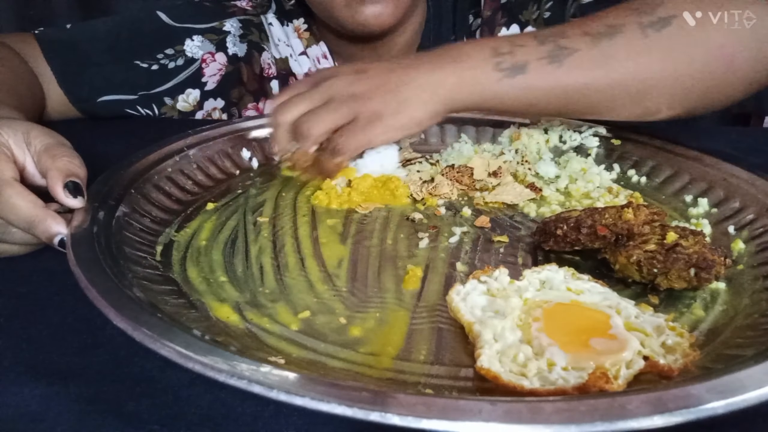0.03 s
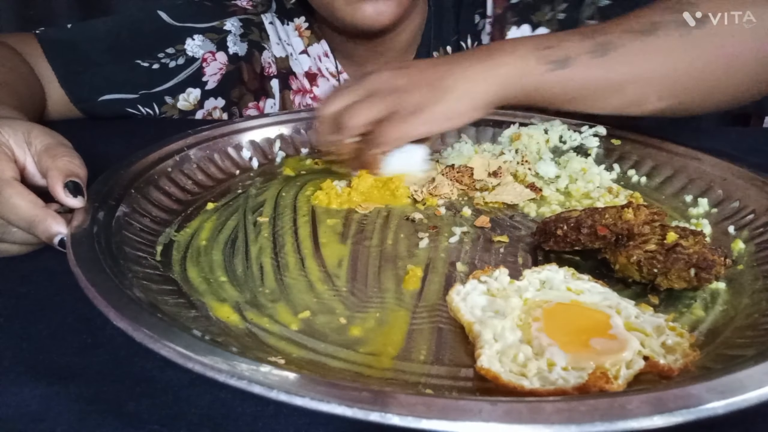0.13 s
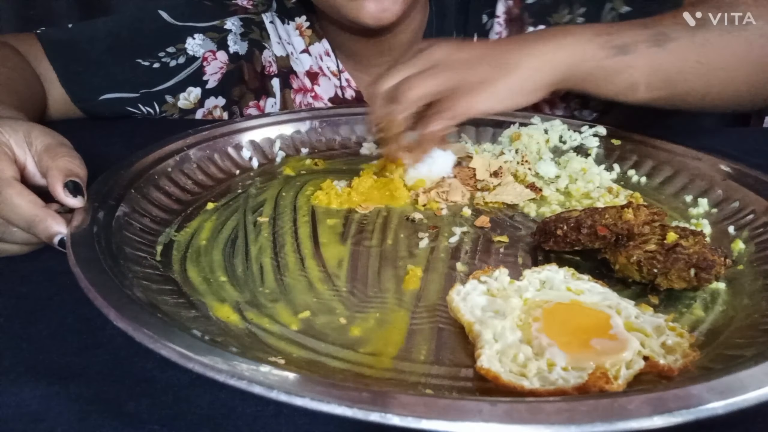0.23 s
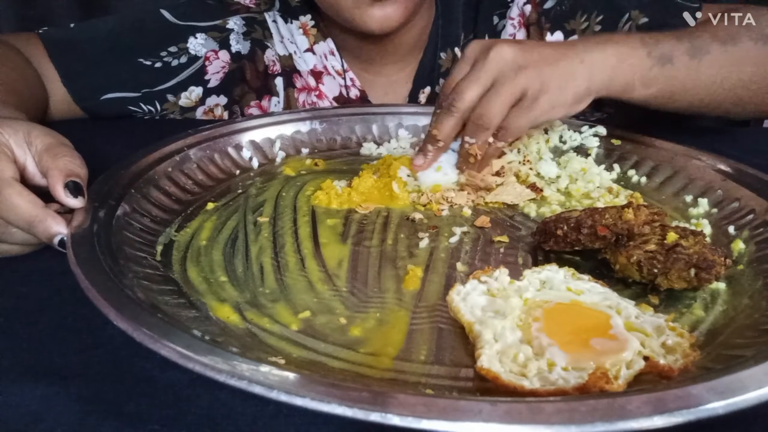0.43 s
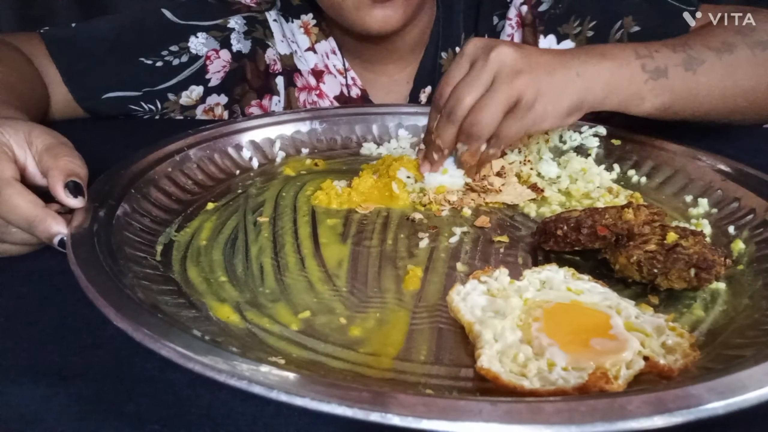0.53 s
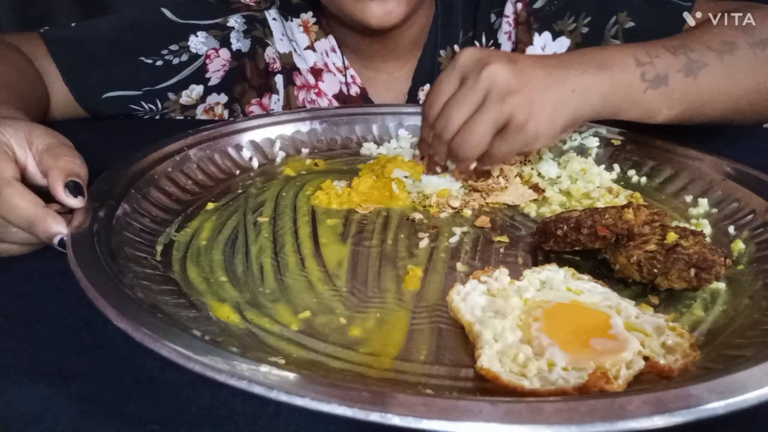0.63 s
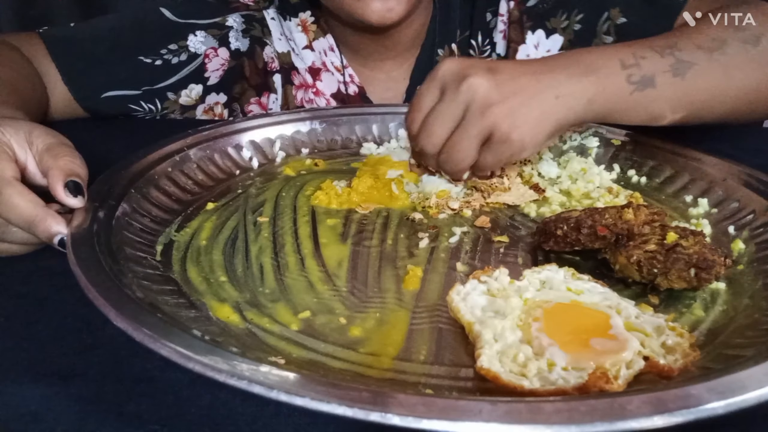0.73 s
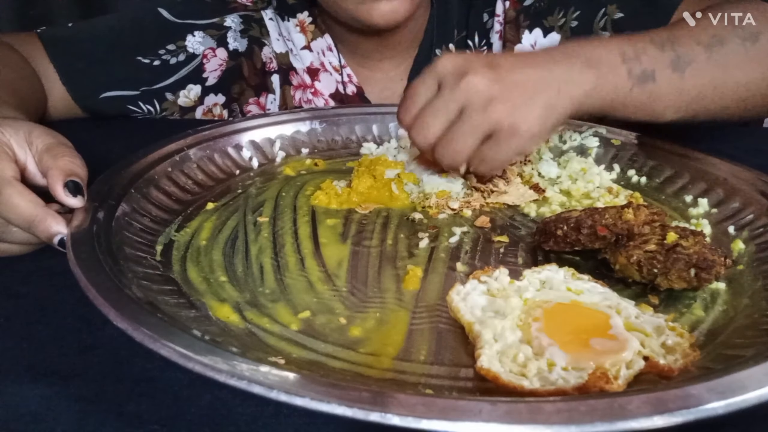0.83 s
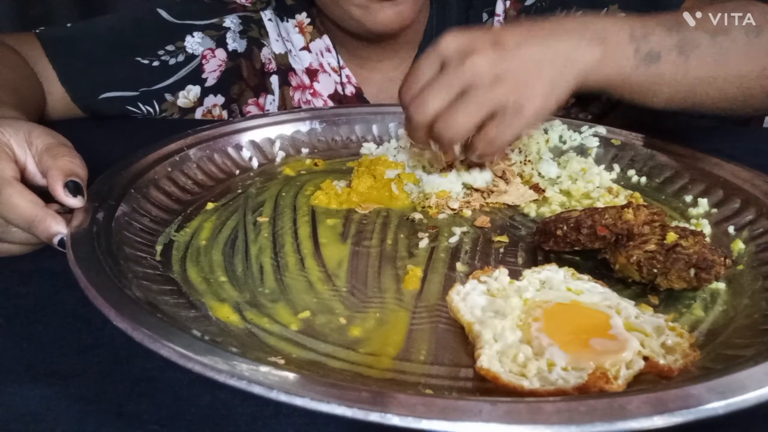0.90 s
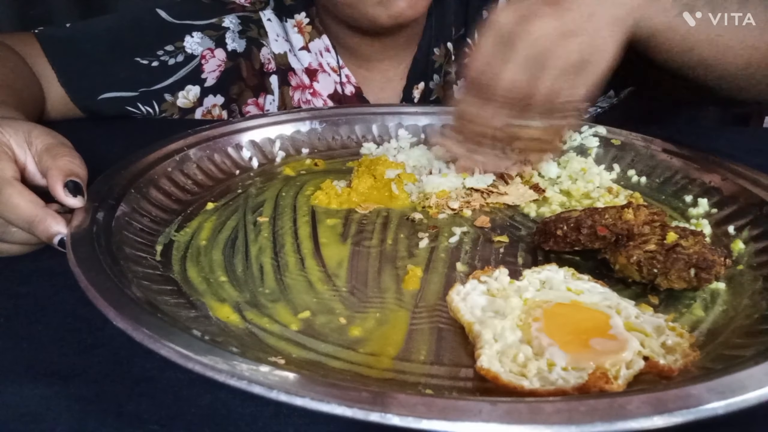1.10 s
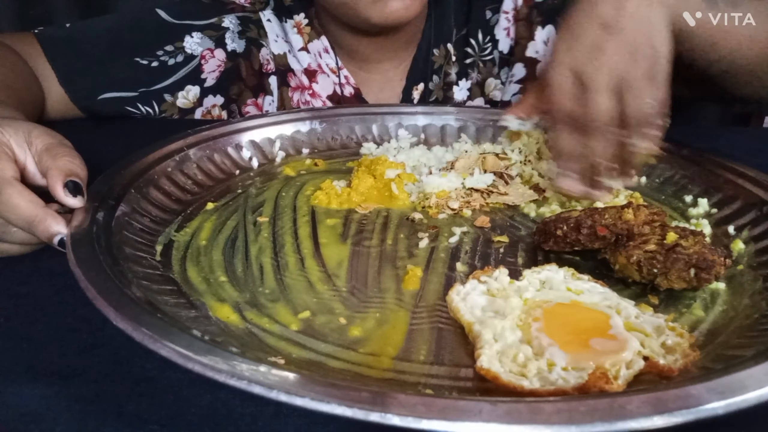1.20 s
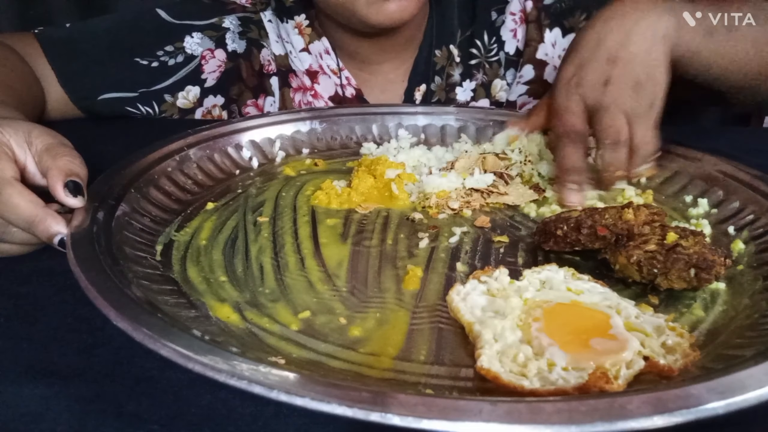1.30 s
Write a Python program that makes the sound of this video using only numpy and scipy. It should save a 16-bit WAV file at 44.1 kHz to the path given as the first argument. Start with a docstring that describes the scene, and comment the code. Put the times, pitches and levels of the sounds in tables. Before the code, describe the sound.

Fingers crush a thin fried wafer with sharp snaps, as a crow caws twice outside.

```python
"""Fingers crush crisp papad, a thin fried wafer, into rice on a steel plate.
Each break is a burst of tiny clicks that rings a flake. Hard snaps also knock the plate,
which the food muffles; small cracks and grinding crumbs crackle around them, and the plate
bumps softly under the fingers. Outside, a crow caws twice with a rough, pulsing voice.
The small room rings briefly with the crushing, over a quiet hiss."""
import sys
import numpy as np
from scipy import signal
from scipy.fft import rfft, irfft
from scipy.io import wavfile
from scipy.ndimage import uniform_filter1d, map_coordinates

SR = 44100
rng = np.random.default_rng(int(sys.argv[2]) if len(sys.argv) > 2 else 0)


def log_audio(samples):
    """Write samples as a 16-bit WAV file to the path given in sys.argv[1]."""
    # one column per channel
    frames = np.atleast_2d(samples).T
    # limit to full scale, then quantise
    limited = np.clip(frames, -1, 1)
    pcm = np.round(limited * 32767).astype(np.int16)
    wavfile.write(sys.argv[1], SR, pcm)


N = 59535

# Hard snaps: start_s, level_db, treble_db, ring_hz, decay_s, plate_db
SNAPS = [(0.2034, -13, -1, 2930, 0.0036, -23), (0.2449, -21, -6.5, 2900, 0.0019, -48),
         (0.6174, -22.5, 1, 2500, 0.0016, -55.5)]
# Tone of a snap: frequency_hz, gain_db
SNAP_TONE = [(60, -41), (550, -42.5), (850, -25.5), (1080, -25.5), (1330, -2.5), (1600, -11), (2000, -11.5),
             (2600, 1), (3000, 2.5), (3800, -3), (4500, -13.5), (5400, -7), (7500, -14.5), (9300, -17.5),
             (11000, -23.5), (12800, -37.5), (15300, -18)]


def snaps():
    """The papad breaks hard, and each break knocks the plate."""
    out = np.zeros(N)
    for start_s, level_db, treble_db, ring_hz, decay_s, plate_db in SNAPS:
        snap = flake_break(SNAP_TONE, treble_db, ring_hz, decay_s, ring_db=-10, echo_db=-2)
        add(out, start_s, undb(level_db) * snap)
        add(out, start_s, undb(plate_db) * plate_ring())
    return out


# Small cracks: start_s, level_db, treble_db, ring_hz, decay_s
CRACKS = [(0.0334, -37.5, -23, 3550, 0.003), (0.054, -41, -35, 3730, 0.00081),
          (0.166, -56.5, 21, 3730, 0.0017), (0.19, -38, 4, 3750, 0.0019), (0.2011, -23, -12, 3810, 0.0041),
          (0.2385, -37.5, 12, 3040, 0.002), (0.254, -42, 0, 3120, 0.00058),
          (0.2883, -33, -9.5, 5360, 0.0012), (0.303, -44, 0, 5380, 0.001),
          (0.338, -34.5, 12.5, 4030, 0.0022), (0.3815, -36, 7, 3920, 0.0045),
          (0.397, -36.5, 37.5, 6350, 0.0022), (0.426, -44, -2, 3880, 0.0013),
          (0.4338, -32.5, 2, 3920, 0.0015), (0.4578, -46.5, 12, 5510, 0.0015),
          (0.466, -39.5, 10, 4090, 0.0015), (0.482, -43, 15.5, 5170, 0.0012),
          (0.5003, -32, -7, 4010, 0.0011), (0.521, -34.5, 0, 3850, 0.00095), (0.526, -41, 3, 3190, 0.0015),
          (0.5433, -39.5, -14.5, 5100, 0.0012), (0.563, -44.5, -5.5, 5080, 0.00065),
          (0.576, -46.5, -5, 5190, 0.0015), (0.5855, -44.5, -1, 5000, 0.0021),
          (0.593, -37, 0, 3060, 0.0045), (0.5997, -35, 0.5, 2820, 0.0024),
          (0.631, -39.5, -14, 2780, 0.0015), (0.786, -35.5, -10.5, 3140, 0.0045),
          (0.874, -47, 2, 2760, 0.0044), (0.885, -36.5, 0.5, 3320, 0.0038), (0.892, -40.5, 6, 3230, 0.0019),
          (1.272, -57, 3.5, 3680, 0.0027)]
# Tone of cracks and crumbs: frequency_hz, gain_db
CRACK_TONE = [(100, -39.5), (700, -37), (1050, -18.5), (1400, -0.5), (2200, -3), (2900, -1.5), (3400, -3),
              (3900, -2), (4600, -5.5), (5300, -5), (6300, -4.5), (7300, -19.5), (9200, -16.5),
              (11000, -30.5), (13000, -40.5), (15300, -21.5)]


def cracks(boost_db=1):
    """Small flakes break off, each ringing at its own pitch."""
    out = np.zeros(N)
    for start_s, level_db, treble_db, ring_hz, decay_s in CRACKS:
        crack = flake_break(CRACK_TONE, treble_db + 1, ring_hz, decay_s, ring_db=11.5, echo_db=-5.5)
        add(out, start_s, undb(level_db + boost_db) * crack)
    return out


def flake_break(tone, treble_db, ring_hz, decay_s, ring_db, echo_db):
    """A run of tiny breaks rings one flake, and the sound bounces off the plate."""
    t = np.arange(4096) / SR
    clicks = np.sign(rng.standard_normal(len(t))) * np.exp(-t / decay_s)
    sound = colour(colour(clicks, tone), [(3320, 0), (8900, treble_db)])
    sound = sound + undb(ring_db) * resonance(sound, ring_hz, q=20)
    echo_s = .0031 * rng.uniform(.9, 1.1)
    sound = sound + undb(echo_db) * np.interp(t - echo_s, t, sound, left=0)
    power = uniform_filter1d(sound ** 2, 130, mode="constant")
    return sound / np.sqrt(power.max())  # level 1 at its loudest


# How loud the crumbling is over time: time_s, level_db
CRUMB_LEVELS = [(0, -57), (.02, -70), (.07, -67.5), (.14, -92), (.19, -55), (.225, -35), (.27, -49),
                (.36, -57), (.40, -47.5), (.53, -50), (.6, -69.5), (.65, -70), (.685, -55), (.72, -90),
                (.80, -67.5), (.85, -79), (.9, -50), (.97, -94.5), (1.2, -75), (1.35, -86.5)]


def crumbs(ticks_per_s=1400, pitch_count=12, spread_db=5):
    """Pieces grind together in a stream of tiny ticks of different sizes and pitches."""
    t = np.arange(N) / SR
    ticks = np.zeros(N)
    for pitch_hz in np.geomspace(2440, 11000, pitch_count):
        sizes = rng.choice([-1, 1], N) * undb(spread_db * np.minimum(rng.exponential(size=N), 2))
        hits = rng.random(N) < ticks_per_s / pitch_count / SR
        ticks += resonance(hits * sizes, pitch_hz, q=7) / np.sqrt(pitch_hz)
    level_db = np.interp(t, *np.array(CRUMB_LEVELS).T)
    return unit(colour(ticks, CRACK_TONE)) * undb(level_db)


# Notes of the food-covered plate: pitch_hz, gain_db, fade_s (time to fall by 60 dB)
PLATE_NOTES = [(837.4, 2, 0.074), (885, -11, .22), (1292.6, -4.5, 0.051), (1907, -17, .15),
               (2303, -4, 0.078), (2946, -12, .12), (3300, -9, 0.11), (3450, -11.5, 0.13),
               (3830, -13.5, .1), (5060, -7.5, .08), (6440, -13, .08)]


def plate_ring():
    """One knock rings the steel plate, and the food quickly stills it."""
    t = np.arange(N) / SR
    ring = np.zeros(N)
    for pitch_hz, gain_db, fade_s in PLATE_NOTES:
        note = np.sin(2 * np.pi * pitch_hz * t) * fade(t, fade_s)
        ring += undb(gain_db) * note * rng.choice([-1, 1])
    return keep_side(ring, "high", 765, order=6)  # slower motion makes little sound


# Finger pushes: start_s, level_db
PUSHES = [(0.206, -59), (0.244, -60), (0.423, -68.5), (0.619, -68.5)]


def pushes(pitch_hz=276, q=1.7, rise_s=0.018):
    """The plate bends under the fingers with soft, low bumps."""
    out = np.zeros(N)
    age = np.arange(N) / SR / rise_s
    swell = age * np.exp(1 - age)
    for start_s, level_db in PUSHES:
        rumble = resonance(rng.standard_normal(N), pitch_hz, q)
        rumble = resonance(rumble, pitch_hz, q)
        add(out, start_s, undb(level_db) * unit(rumble) * swell)
    return out


# Two caws, one list of points each: time_s, pitch_hz, level_db, roughness (capped at 1)
CAWS = [
    [(.26, 443.4, -53, 0.52), (.30, 468.2, -36.5, 0.5), (.345, 482.6, -32, 0.54), (.385, 471.6, -34, 0.64),
     (.44, 458.5, -38, 1.11), (.51, 443.2, -39.5, 0.94), (.55, 421, -54, .95), (.58, 390, -72, 1.1)],
    [(.78, 447, -51, 0.53), (.812, 481.3, -39.5, 0.37), (.86, 496.8, -40, 0.37), (.90, 500.6, -34, 0.31),
     (.937, 477.6, -38.5, 0.31), (.972, 473.2, -45.5, 0.13), (1.012, 442.2, -39.5, 0.29),
     (1.065, 419, -48.5, 0.78), (1.11, 407, -58, 0.8)],
]


def crow():
    """A crow caws twice, and the walls outside smear the sound."""
    calls = sum(caw(points) for points in CAWS)
    calls = keep_side(calls, "high", 1008, order=10)  # the open beak lets out few low notes
    return calls + undb(-4) * reverb(calls, fade_s=0.31, build_s=0.0049)


# Tone of the crow's throat: frequency_hz, gain_db
THROAT_TONE = [(450, -46.5), (780, -29), (990, -13.5), (1130, -36.5), (1420, -7.5), (1620, -15), (1950, 1),
               (2200, 1.5), (2450, -2), (2780, -21), (3050, -23.5), (3380, -23.5), (3700, -35.5),
               (4200, -37), (4800, -29), (5300, -50), (9000, -56)]


def caw(points, waver_hz=59.88, flutter_hz=328, throat_pitch_hz=482.5):
    """Uneven pulses and raspy breath pass through the throat, sinking and roughening at the end."""
    t = np.arange(N) / SR
    time_s, pitch_hz, level_db, roughness = np.array(points).T
    roughness = np.clip(np.interp(t, time_s, roughness), 0, 1)
    pitch_hz = np.interp(t, time_s, pitch_hz) * (1 + 0.0051 * wander(waver_hz))
    speed = np.where(t > time_s[0], pitch_hz / throat_pitch_hz, 1)
    pitch_shake = 1 + .06 * roughness * wander(flutter_hz)
    phase = 2 * np.pi * np.cumsum(pitch_hz / speed * pitch_shake) / SR
    pulses = unit(sum(np.cos(k * phase) for k in range(1, 17)))
    pulses *= 1 + 0.23 * roughness * wander(flutter_hz)
    rasp = rng.standard_normal(N) * (1 + np.cos(phase))  # one puff of noise per pulse
    call = unit(colour(pulses, THROAT_TONE)) + undb(1) * roughness * unit(colour(rasp, THROAT_TONE))
    # Changing the speed bends the pitch and the throat's tone together.
    call = map_coordinates(call, [np.cumsum(speed)], mode="mirror")
    call = call / np.sqrt(uniform_filter1d(call ** 2, size=1300) + 1e-9)  # even out the level
    level_db = np.interp(t, time_s, level_db, left=-120, right=-120)
    return call * undb(level_db + 1.06 * wander(waver_hz))


# Tone of the room's echoes: frequency_hz, gain_db
ROOM_TONE = [(100, 8), (600, 3.5), (3000, -3), (6000, -5.5), (9500, -3.5), (12000, -9.5), (15000, -5.5)]


def room(sound, split_hz=21000, build_s=0.018):
    """The small room's walls throw the sound back for about a tenth of a second."""
    low = reverb(keep_side(sound, "low", split_hz, order=2), fade_s=0.1, build_s=build_s)
    high = reverb(keep_side(sound, "high", split_hz, order=2), fade_s=0.11, build_s=build_s)
    return undb(-8.5) * colour(low + high, ROOM_TONE)


# Tone of the background: frequency_hz, gain_db
HISS_TONE = [(25, -35), (60, -27.5), (95, -13.5), (140, -18.5), (380, -13), (750, -7.5), (1150, -8),
             (1400, 6.5), (1700, 2), (2350, -3.5), (2800, -12), (3800, -26), (5000, -34.5), (9000, -36),
             (13000, -52.5), (15500, -37)]


def hiss(level_db=-56):
    """A quiet hiss whose level wavers slightly."""
    noise = unit(colour(rng.standard_normal(N), HISS_TONE))
    return noise * undb(level_db + 0.23 * wander(9.9))


def undb(db):
    """Turn decibels into a multiplier."""
    return 10 ** (np.asarray(db) / 20)


def unit(x):
    """Scale to an average power of 1."""
    return x / np.sqrt(np.mean(x ** 2) + 1e-20)


def fade(t, fade_s):
    """A smooth fall of 60 dB every fade_s seconds."""
    return np.exp(-np.log(1000) * t / fade_s)


def wander(hz):
    """A random wobble of size about 1 that picks a new value hz times a second."""
    t = np.arange(N) / SR
    return unit(np.interp(t * hz, np.arange(N), rng.standard_normal(N)))


def add(out, start_s, x):
    """Mix a sound in at its start time."""
    i = max(int(start_s * SR), 0)
    out[i:i + len(x)] += x[:max(N - i, 0)]


def resonance(x, hz, q):
    """Ring at one pitch; a higher q rings longer."""
    return signal.lfilter(*signal.iirpeak(hz, q, fs=SR), x)


def keep_side(x, side, edge_hz, order):
    """Keep the "low" or "high" side of a frequency; a higher order cuts more sharply."""
    return signal.sosfilt(signal.butter(order, edge_hz, side, fs=SR, output="sos"), x)


def colour(x, tone, size=2048):
    """Shape a sound's tone along (frequency_hz, gain_db) points."""
    hz, db = np.array(tone, float).T
    grid_hz = np.maximum(np.arange(size // 2 + 1) * SR / size, 1)
    gains = undb(np.interp(np.log(grid_hz), np.log(hz), db))
    # Fold the filter in time so that it never rings before the sound arrives.
    folded = irfft(np.log(gains))
    folded[1:size // 2] *= 2
    folded[size // 2 + 1:] = 0
    click_response = irfft(np.exp(rfft(folded)))
    return signal.fftconvolve(x, click_response)[:len(x)]


def reverb(x, fade_s, build_s):
    """A blur of echoes that builds up and dies away."""
    t = np.arange(N) / SR
    build_up = 1 - np.exp(-(t / build_s) ** 2)
    tail = rng.standard_normal(N) * fade(t, fade_s) * build_up
    return signal.fftconvolve(x, unit(tail))[:N] / np.sqrt(N)


def scene():
    """Mix the crushing, its room, the plate's bumps, the crow and the hiss into one channel."""
    crushing = snaps() + cracks() + crumbs()
    return (crushing + room(crushing) + pushes() + crow() + hiss())[None]


def record(dry):
    """Cut the highest treble, above 15900 Hz."""
    return signal.sosfilt(signal.ellip(8, .2, 70, 15900, fs=SR, output="sos"), dry)


dry = scene()
out = record(dry)
log_audio(out)
```